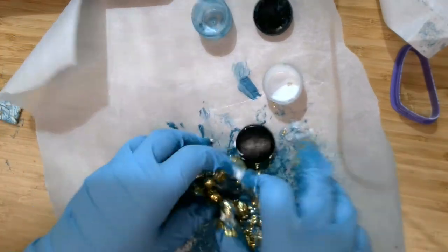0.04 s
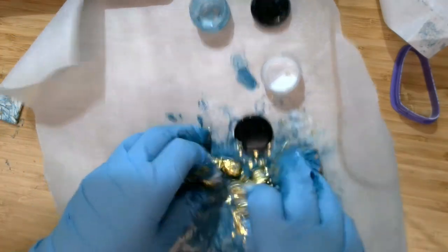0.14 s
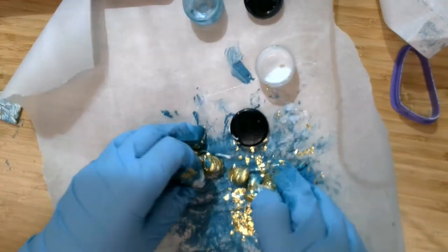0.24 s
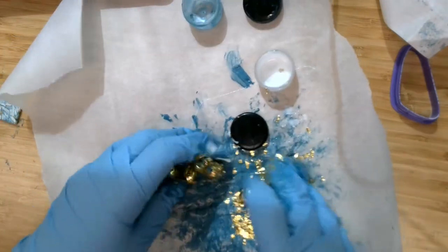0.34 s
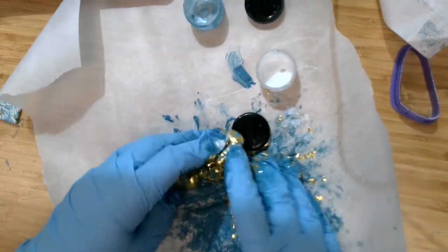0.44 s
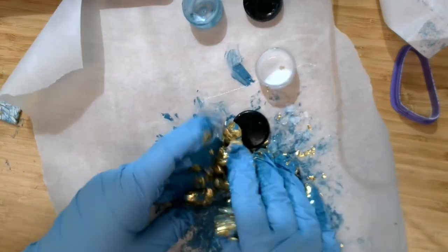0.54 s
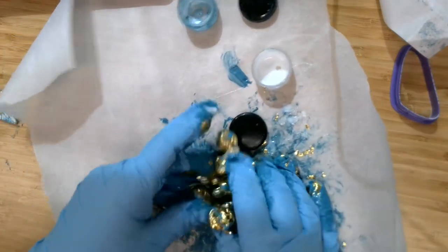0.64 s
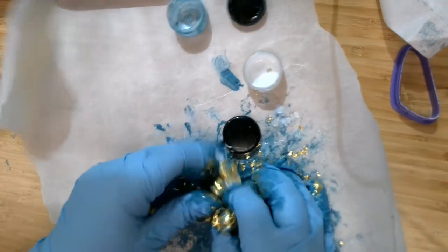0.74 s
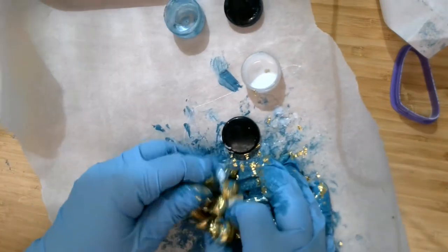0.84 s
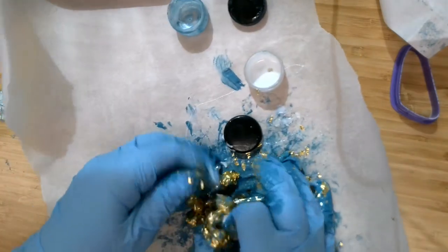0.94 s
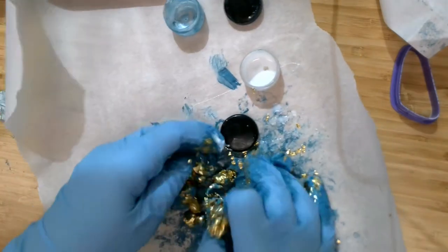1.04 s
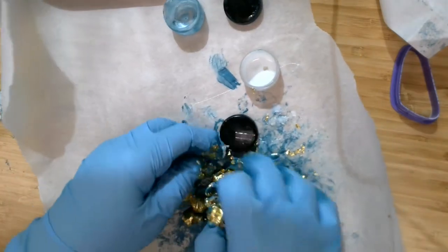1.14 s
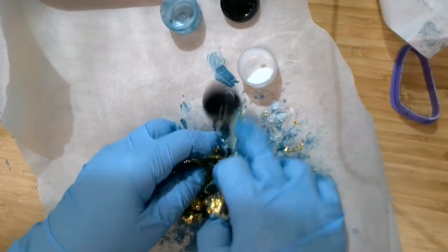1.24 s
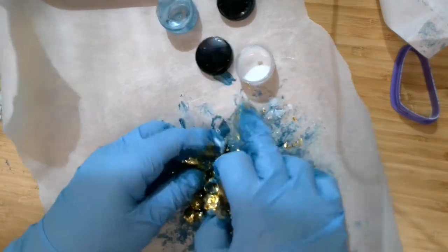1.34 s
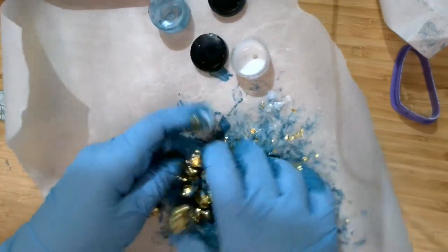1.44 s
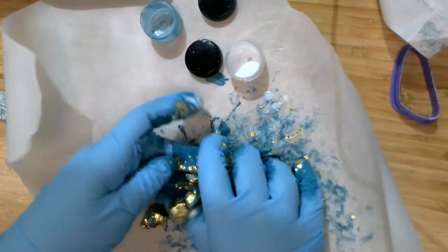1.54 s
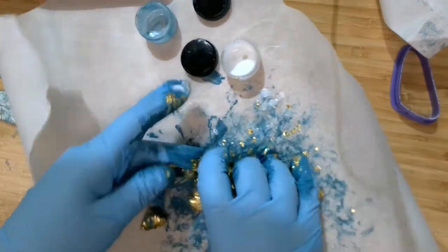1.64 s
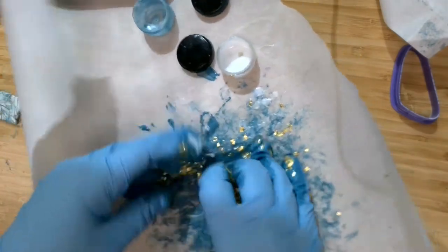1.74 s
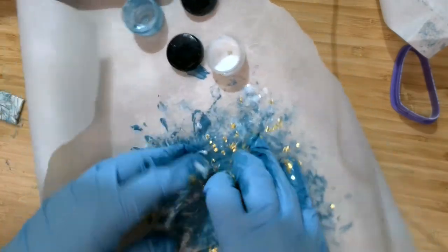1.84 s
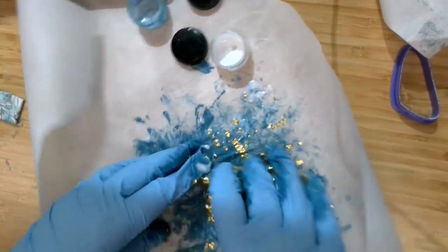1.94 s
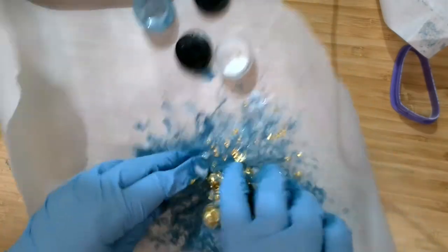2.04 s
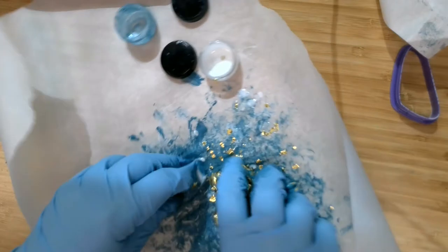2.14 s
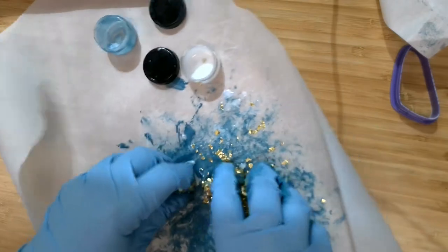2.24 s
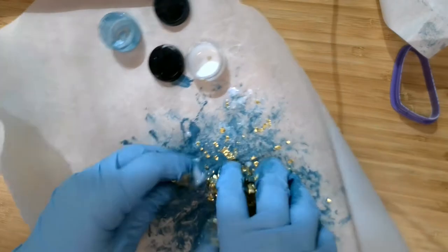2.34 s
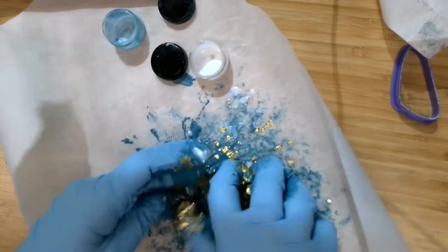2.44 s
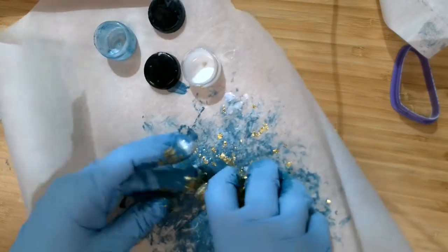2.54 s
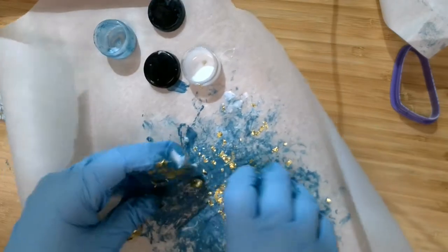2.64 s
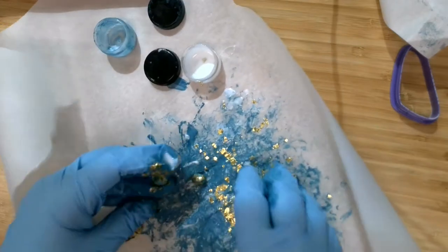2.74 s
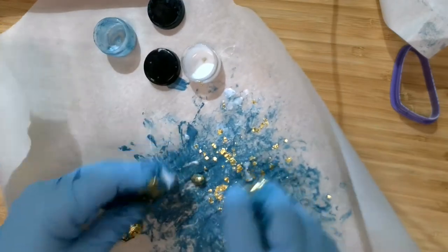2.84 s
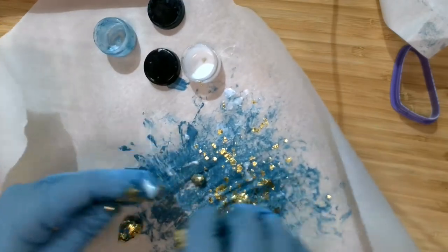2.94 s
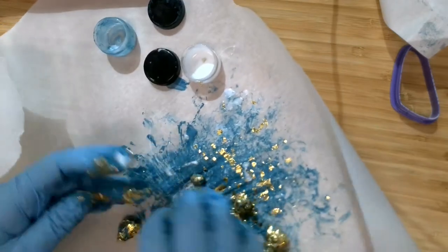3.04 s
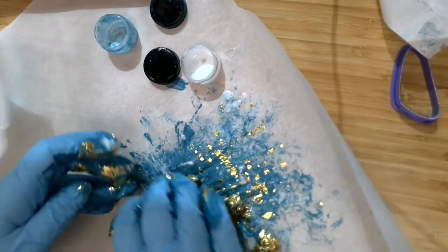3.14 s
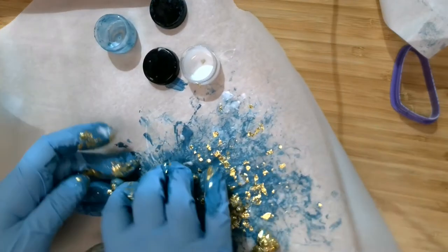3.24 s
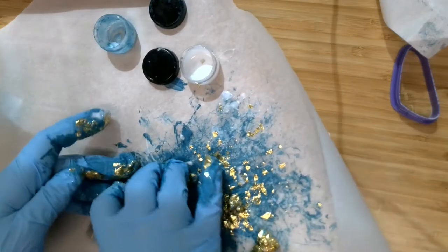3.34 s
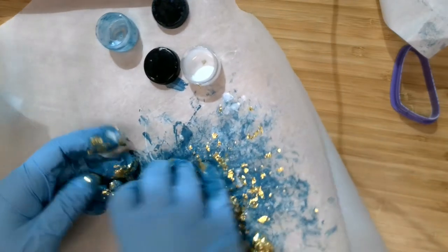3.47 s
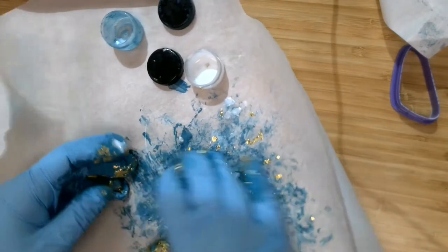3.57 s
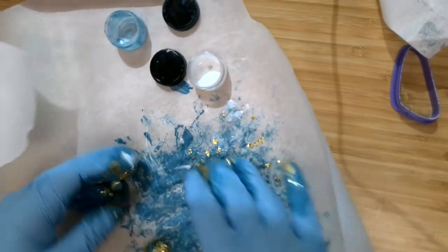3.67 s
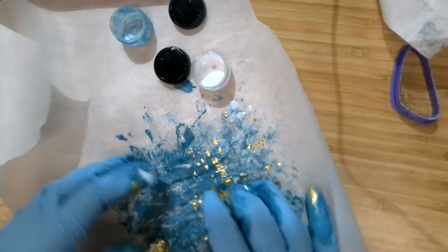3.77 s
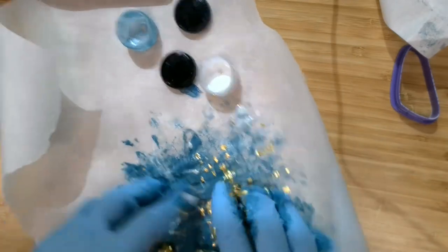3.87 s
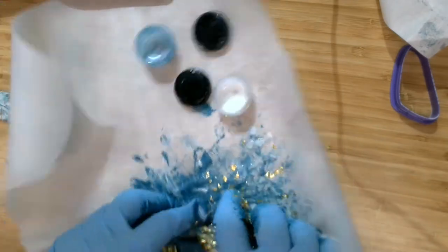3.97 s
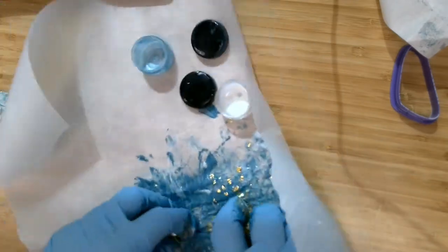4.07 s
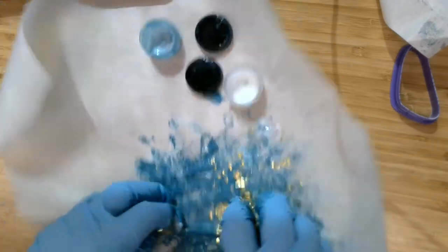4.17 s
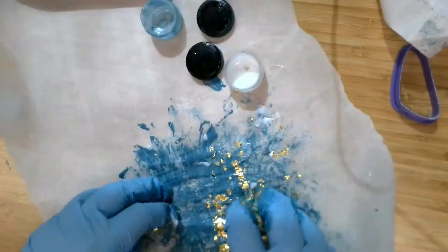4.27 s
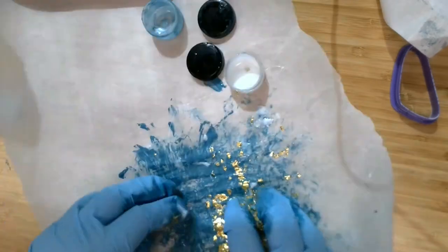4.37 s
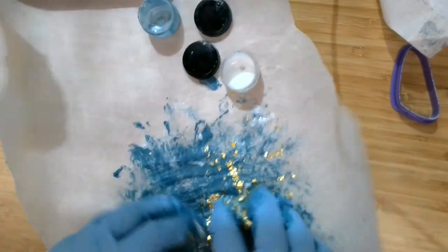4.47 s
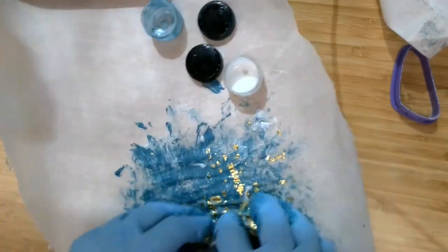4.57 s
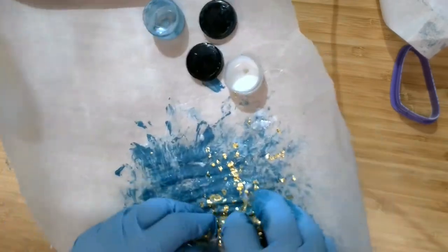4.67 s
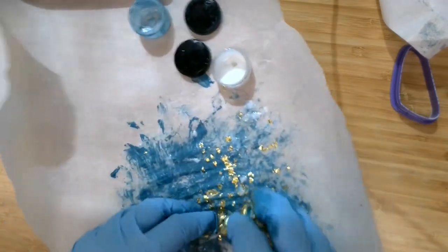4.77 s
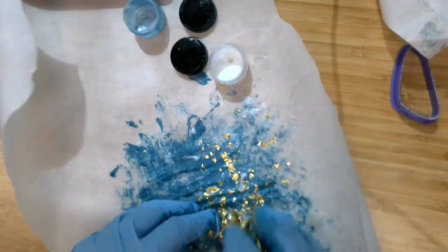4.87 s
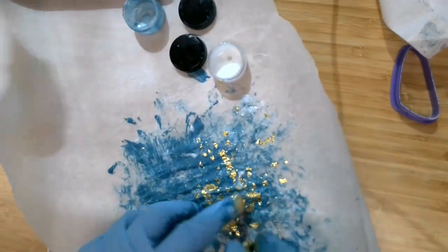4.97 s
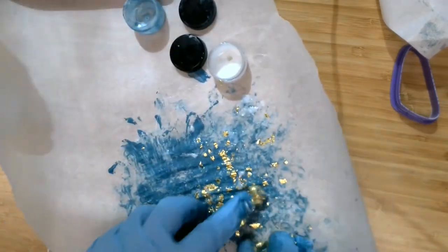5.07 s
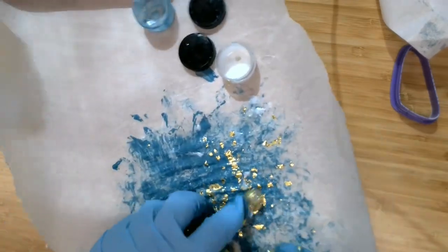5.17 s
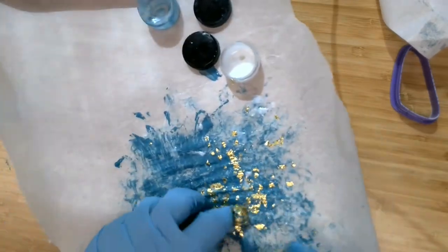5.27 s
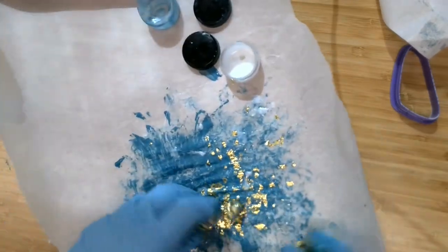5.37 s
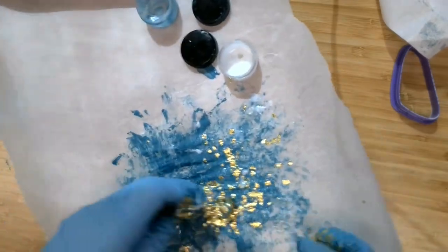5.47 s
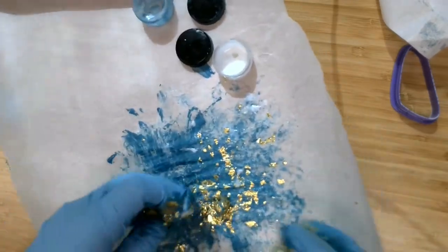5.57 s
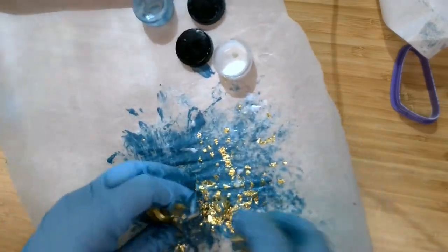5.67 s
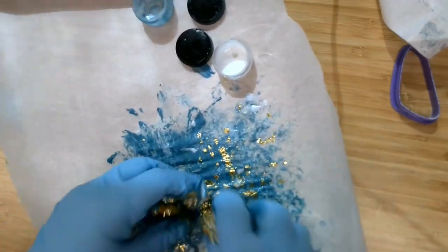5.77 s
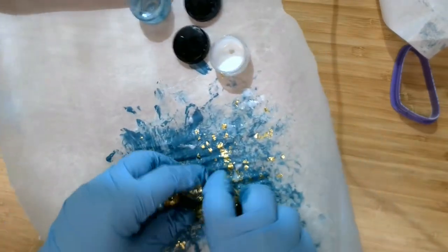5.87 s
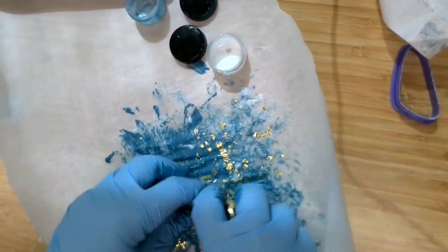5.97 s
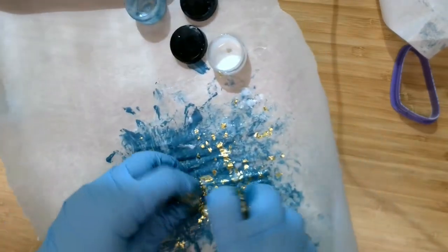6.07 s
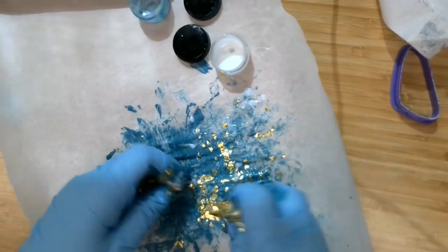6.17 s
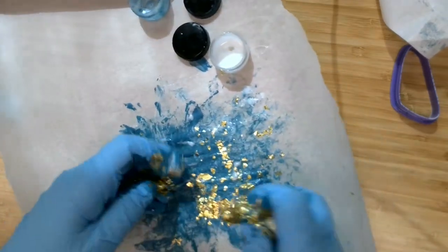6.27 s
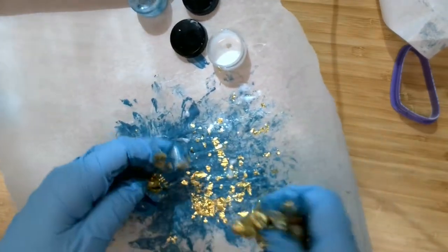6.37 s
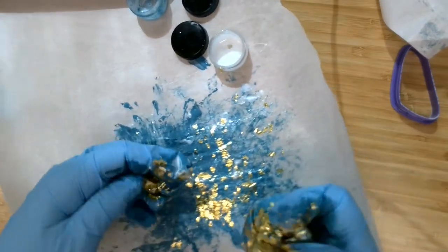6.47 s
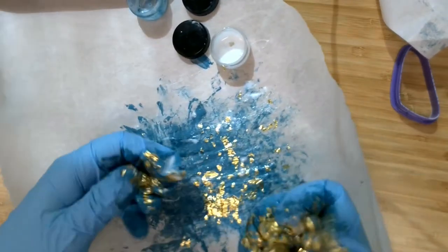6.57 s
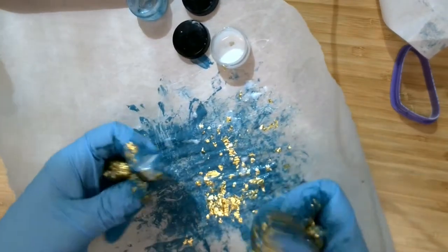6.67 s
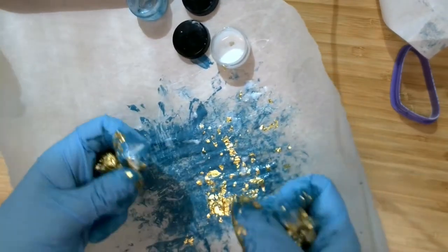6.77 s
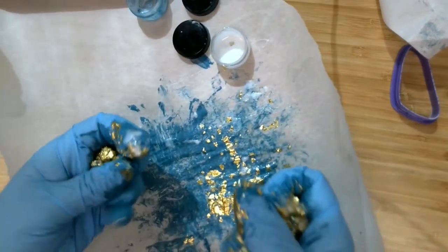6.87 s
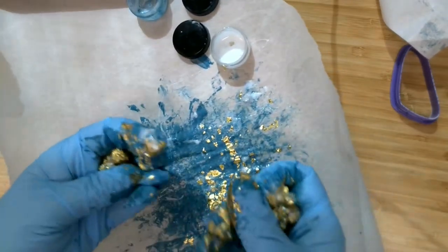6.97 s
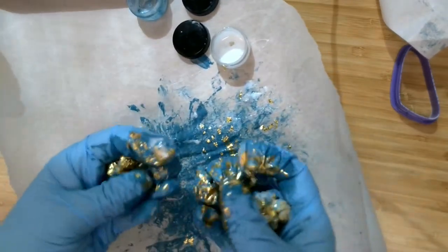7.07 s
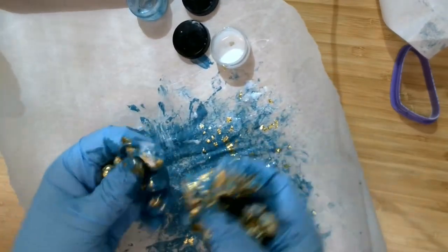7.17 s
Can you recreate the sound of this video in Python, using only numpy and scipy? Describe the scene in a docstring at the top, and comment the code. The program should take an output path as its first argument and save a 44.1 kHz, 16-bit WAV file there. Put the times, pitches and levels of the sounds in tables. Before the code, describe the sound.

Close crinkly rustling and sharp little pops of baking paper as gloves knead tacky clay, busiest around four seconds, over a faint low room hum.

```python
"""Gloved hands press and gather sticky clay on baking paper on a wooden table, close to a small microphone.
Each push sets off showers of tiny clicks: the sheet crackles as it flexes and the gloves hiss over it.
Folds snap as a pop with a burst of noise, and bumps on the table thud as fading tones with a noisy smear.
A jar lid clacks and scrapes as it is moved, made from short ringing tones and noise.
Sheet and table resonances colour the handling; a small room and a low ventilation rumble surround it."""
import sys
import numpy as np
from scipy import signal
from scipy.fft import rfft, irfft, next_fast_len
from scipy.io import wavfile
from scipy.ndimage import uniform_filter1d

SR = 44100
rng = np.random.default_rng(int(sys.argv[2]) if len(sys.argv) > 2 else 0)


def store_wav(level_fs):
    """Save 16-bit WAV to argv[1]."""
    pcm = np.round(np.clip(np.atleast_2d(level_fs), -1, 1) * 32767)
    wavfile.write(sys.argv[1], SR, pcm.T.astype(np.int16))


N = 317961

# Ventilation spectrum. Each row: frequency in Hz, relative strength in dB per Hz.
RUMBLE_SPECTRUM = [(20, -28), (45, -44), (60, -24), (80, -16), (115, -0.5), (150, 1.5), (200, -8),
                   (280, -11.5), (390, -15), (500, -22), (680, -25), (900, -35.5), (2000, -45),
                   (11000, -64)]
# Lid taps as it is picked up and set down. Each row: start in seconds, level in dB before a shared cut.
LID_TAPS = [(1.2773, -24), (1.3084, -32), (1.3385, -28), (1.4349, -27), (1.4365, -12.5), (1.4376, -27)]
# Lid scraping over the sheet. Each row: middle in seconds, length in seconds, level in dB.
LID_SLIDES = [(1.281, 0.01, -36), (1.311, 0.016, -35), (1.457, 0.06, -40.5)]
# Ringing tones of the plastic lid. Each row: pitch in Hz, level in dB, time to fade by 60 dB in seconds.
LID_MODES = [(2680, -1.5, 0.013), (3290, -2, 0.008), (4330, -15, 0.004), (5560, -3, 0.0058),
             (8265, 3, 0.005)]
# Lid rattle and scrape spectrum. Each row: frequency in Hz, relative strength in dB per Hz.
CLACK_SPECTRUM = [(100, -38), (500, 1), (880, -37), (1300, -17), (2000, 5), (3000, 10.5), (4500, -6),
                  (6500, -2), (10000, -10), (12000, -4)]
# Hands and clay bumping the table. Each row: start in seconds, level in dB before a shared cut,
# hardness in dB (harder is brighter and noisier), pitch of the thud in Hz.
BUMPS = [(.123, -39, 2, 296), (1.437, -43, 5, 480), (2.871, -43.5, -6.5, 380), (3.174, -43.5, -0.5, 586),
         (3.207, -38.5, -5.5, 380), (3.209, -38.5, -12, 195), (3.246, -40, -7, 259), (3.597, -39, 8, 380),
         (3.999, -45.5, 9.5, 557), (4.043, -35, 0, 400), (4.1, -34, -10, 597), (4.285, -47, -3, 560),
         (4.554, -40.5, -8, 140.8), (4.571, -37.5, -15, 354), (4.58, -33, -9.5, 267),
         (5.166, -38, -10, 399.6), (5.176, -32.5, -16, 351), (5.197, -35.5, -30.5, 180.4),
         (5.34, -40, -27.5, 138.8), (5.631, -49, -14, 585), (5.939, -44, -5, 326)]
# Spectrum of bump smear and table rumble. Each row: frequency in Hz, relative strength in dB per Hz.
BUMP_SPECTRUM = [(30, -33), (70, -19), (130, 4), (220, 4.5), (380, 4), (500, -3), (620, -3), (850, -12),
                 (1200, -10), (1800, -31), (4000, -83)]
# Resonances of sheet and table top. Each row: centre in Hz, width in Hz, height added to a gain of 1 in dB.
SHEET_RESONANCES = [(395, 33, -7), (579, 16, -1), (1300, 76, -13.5), (1812, 295, 1), (2484, 320, -7),
                    (3280, 420, -10.5), (4430, 270, -9), (5610, 106, -0.5), (6310, 220, -3),
                    (7150, 78, -22)]
# Folds that snap out of the rustle. Each row: time of the pop in seconds, level in dB before a shared cut,
# brightness in dB per octave, time for the run along the fold to fade by 60 dB in seconds,
# pitch of the flipped facet in Hz.
CREASES = [(0.1045, -32, -4, 0.028, 2120), (0.1223, -28, 2, 0.01, 1770), (0.1268, -20, 1, 0.015, 2030),
           (0.232, -35, -2, 0.016, 1600), (0.246, -33, -1, 0.039, 2500), (0.258, -36.5, -3, 0.011, 1600),
           (0.293, -48, -3, 0.029, 1596), (0.3198, -38, 1, 0.008, 1400), (0.363, -40, 0, 0.0068, 2880),
           (0.4463, -36, -5.5, 0.051, 1820), (0.508, -42, -1, 0.0072, 8340), (0.538, -47, 7, 0.011, 6500),
           (0.65, -46, -9, 0.025, 9500), (0.781, -38, -0.5, 0.041, 5000), (0.803, -35, 0.5, 0.046, 4100),
           (0.825, -36, 4, 0.036, 9100), (1.046, -41.5, -8, 0.028, 1303),
           (1.1203, -47.5, -10, 0.0082, 1246), (1.193, -54, 1, 0.007, 7000),
           (1.2775, -25.5, 12, 0.011, 6970), (1.2791, -29, -2, 0.012, 2800), (1.3125, -30, 14, 0.02, 8500),
           (1.323, -30, 19, 0.012, 8600), (1.334, -30, -3.5, 0.015, 3480),
           (1.3379, -27, -2.5, 0.0085, 7500), (1.3435, -36, 4, 0.01, 3730), (1.348, -28.5, 6, 0.011, 3680),
           (1.5171, -42, -4, 0.008, 3200), (1.6432, -37, -5, 0.015, 2380), (1.6631, -33, 5, 0.014, 3080),
           (1.667, -33, -5, 0.016, 2850), (1.6852, -34, -3, 0.018, 1920), (1.7197, -45, -5.5, 0.007, 2190),
           (1.736, -38.5, -4, 0.013, 3120), (1.7448, -42.5, -4.5, 0.011, 3780),
           (1.7562, -32.5, 1, 0.014, 3430), (1.761, -35, -4.5, 0.02, 2414), (1.7773, -44, -1, 0.008, 3000),
           (1.793, -48, -2, 0.009, 3500), (1.834, -43.5, 2.5, 0.021, 4940), (1.909, -46, -5, 0.031, 1214),
           (2.0, -39.5, -7.5, 0.011, 1300), (2.003, -36, -2.5, 0.018, 1100),
           (2.022, -31.5, -2, 0.024, 2930), (2.031, -38, 1, 0.027, 3260), (2.0646, -34.5, -4, 0.023, 1304),
           (2.34, -38.5, 0, 0.018, 3910), (2.3857, -39, 7.5, 0.024, 9800), (2.392, -32.5, 1.5, 0.02, 9500),
           (2.4266, -29.5, -1, 0.043, 1417), (2.4582, -31, 3.5, 0.031, 2900), (2.551, -46, 1, 0.008, 2910),
           (2.603, -39, 4.5, 0.021, 6020), (2.667, -45, 0, 0.023, 2760), (2.686, -41, 1.5, 0.009, 3680),
           (2.7035, -50.5, -2, 0.015, 4650), (2.827, -44, 1, 0.047, 4070), (2.844, -45, 4, 0.0078, 6450),
           (2.876, -41.5, -1.5, 0.034, 1117), (2.922, -39.5, 3, 0.015, 6300),
           (3.14, -46.5, -4, 0.025, 4830), (3.1755, -45, 8, 0.012, 1010), (3.207, -43, -8, 0.007, 1090),
           (3.259, -44.5, -3, 0.026, 5500), (3.2977, -40.5, 4, 0.012, 2190), (3.317, -48, 5.5, 0.01, 7140),
           (3.5409, -43, -9.5, 0.014, 2560), (3.5665, -50, -7, 0.0084, 3030),
           (3.6014, -35, -0.5, 0.017, 1786), (3.6718, -39, -4.5, 0.013, 1420),
           (3.686, -43, 0.5, 0.012, 2210), (3.889, -37.5, 0.5, 0.016, 6130),
           (4.0025, -30, -1.5, 0.013, 2990), (4.01, -36.5, -1, 0.022, 3200), (4.038, -28, 0.5, 0.025, 3150),
           (4.045, -16.5, 0, 0.051, 2284), (4.053, -18.5, 5, 0.017, 8640), (4.107, -22, -3.5, 0.03, 4660),
           (4.1148, -27, 3, 0.008, 7500), (4.119, -20, 2, 0.017, 1800), (4.1285, -20, 6, 0.013, 5500),
           (4.135, -26.5, 0.5, 0.016, 3700), (4.145, -23.5, -1, 0.01, 1390), (4.1513, -33, -4, 0.011, 4370),
           (4.229, -32, 4, 0.011, 8500), (4.2692, -20, 4, 0.013, 9630), (4.282, -23.5, 10, 0.012, 6270),
           (4.286, -23, -2, 0.015, 2084), (4.2922, -19.5, -6, 0.0093, 1997),
           (4.299, -21.5, -2, 0.012, 2700), (4.3038, -25, -3, 0.013, 1310), (4.314, -27, -3, 0.017, 2400),
           (4.324, -30, 3, 0.012, 1715), (4.33, -25.5, -3, 0.022, 1660), (4.34, -38, -6.5, 0.025, 2420),
           (4.41, -41, -4.5, 0.025, 1930), (4.472, -44, -0.5, 0.0074, 4260), (4.526, -35, 2.5, 0.012, 2630),
           (4.5643, -31.5, 4.5, 0.0063, 8400), (4.5915, -32.5, -3, 0.014, 1600),
           (4.6003, -31, 1.5, 0.03, 1600), (4.6297, -26.5, 1, 0.014, 4300), (4.703, -29, -0.5, 0.018, 2230),
           (4.7406, -42, 6, 0.011, 5330), (4.8713, -37, 11, 0.012, 6240), (4.887, -36, -4.5, 0.032, 7200),
           (4.893, -29, 6.5, 0.0063, 7300), (4.943, -42, 4.5, 0.024, 4050), (5, -45, -0.5, 0.022, 5600),
           (5.167, -31.5, -6.5, 0.026, 2680), (5.1749, -31.5, -9.5, 0.047, 2660),
           (5.198, -41, -5, 0.012, 2480), (5.21, -35.5, -9.5, 0.015, 2006), (5.253, -30, -9, 0.045, 1290),
           (5.264, -27.5, -2, 0.017, 2490), (5.2943, -26, 0, 0.029, 1990), (5.299, -22, -2.5, 0.021, 2000),
           (5.3146, -31.5, 5, 0.014, 2770), (5.3867, -38.5, -3, 0.01, 1900), (5.5614, -40, 6, 0.018, 3650),
           (5.567, -27.5, 9.5, 0.01, 3730), (5.5962, -44, 0, 0.01, 4500), (5.615, -44, 4, 0.008, 3025),
           (5.9258, -36.5, 2, 0.01, 3320), (5.9475, -39, -5.5, 0.032, 2570),
           (6.023, -30.5, -3, 0.014, 3330), (6.1017, -44.5, -5.5, 0.015, 2390),
           (6.1118, -44, -7, 0.01, 2420), (6.132, -49, -3.5, 0.018, 1610), (6.14, -48, -5, 0.014, 3030),
           (6.158, -36, -1, 0.01, 2420), (6.175, -45, -6, 0.012, 6300), (6.2013, -41.5, -6.5, 0.019, 2520),
           (6.2608, -46, -1.5, 0.011, 3670), (6.2722, -27.5, -1.5, 0.012, 8000),
           (6.279, -44, 0, 0.0083, 4500), (6.345, -43, -2, 0.008, 3370), (6.351, -38, -3.5, 0.01, 2010),
           (6.3575, -39.5, -6, 0.011, 4600), (6.372, -37.5, -4.5, 0.026, 3440),
           (6.3897, -37, -3, 0.011, 4370), (6.4157, -40.5, -3, 0.014, 2990), (6.444, -38, 1, 0.024, 6080),
           (6.465, -45, 1.5, 0.014, 2520), (6.476, -42, -1, 0.012, 3790),
           (6.5118, -40.5, -3.5, 0.025, 3370), (6.556, -34.5, -3.5, 0.036, 3460),
           (6.5642, -31, -1, 0.031, 3130), (6.5726, -35, -2.5, 0.02, 3080), (6.5915, -37, -1, 0.019, 3070),
           (6.6702, -44, 1.5, 0.014, 5200), (6.782, -58, -6.5, 0.011, 2850),
           (6.807, -55, -3.5, 0.031, 9150), (6.848, -52, -9.5, 0.025, 1003), (6.914, -56, -4, 0.026, 1375),
           (7.133, -50.5, -1.5, 0.04, 1600)]
# Spectrum of snapping folds. Each row: frequency in Hz, relative strength in dB per Hz.
SNAP_SPECTRUM = [(50, -37), (150, -39.5), (450, -6.5), (680, -6.5), (900, -7), (1200, -0.5), (2000, -2),
                 (3000, 4.5), (4500, 3.5), (7000, 6.5), (9000, 3), (10500, -0.5), (12000, -12.5)]
# Spectrum of the flexing sheet. Each row: frequency in Hz, relative strength in dB per Hz.
CRACKLE_SPECTRUM = [(40, -31), (100, -25), (250, -7), (400, -5.5), (650, 4.5), (900, -3), (1150, 9.5),
                    (1500, 0.5), (2000, 5), (3000, 8), (4200, 2.5), (6000, 2), (11000, -26.5)]
# Spectrum of the gloves' hiss. Each row: frequency in Hz, relative strength in dB per Hz.
SCUFF_SPECTRUM = [(500, -52), (2000, -15.5), (3500, -8.5), (5000, 0), (6500, 2.5), (7500, 4), (9000, 4),
                  (10500, -1), (12000, -12)]
# Pushes of the hands. Each row: start in seconds, length in seconds, crackle of the flexing sheet in dB,
# hiss of gloves and clay in dB, swell from start to end in dB.
PUSHES = [(0.096, 0.033, -45, -43, 3.5), (0.162, 0.045, -47, -45.5, 5.5), (0.22, 0.066, -44, -42, -0.5),
          (0.349, 0.051, -48.5, -53, -5), (0.496, 0.059, -62.5, -58, -13), (0.728, 0.1, -51, -43, 3.5),
          (0.831, 0.029, -54.5, -49.5, -5), (0.91, 0.05, -61.5, -55.5, 3.5), (1.052, 0.13, -64.5, -70, 9.5),
          (1.306, 0.0093, -42, -42, -2.5), (1.44, 0.12, -51.5, -48, -6), (1.625, 0.2, -48.5, -47.5, -9),
          (1.907, 0.024, -57, -48, -2.5), (2.028, 0.032, -41, -45, 1), (2.119, 0.072, -51, -45.5, -5),
          (2.263, 0.18, -50, -44, 3.5), (2.581, 0.19, -60, -52.5, -12), (2.915, 0.11, -58, -50, 3.5),
          (3.151, 0.21, -60, -55.5, -7), (3.577, 0.09, -48, -44.5, 3.5), (3.768, 0.13, -64, -60, 6.5),
          (4.007, 0.033, -34.5, -32.5, 6.5), (4.071, 0.058, -31, -37, 2), (4.161, 0.063, -38.5, -40.5, 4),
          (4.241, 0.083, -30.5, -33.5, 4), (4.369, 0.09, -53, -58, -20.5), (4.599, 0.1, -45.5, -41, -3.5),
          (4.802, 0.095, -55.5, -52, 1.5), (4.991, 0.067, -63.5, -57.5, -1.5),
          (5.235, 0.069, -41.5, -42.5, 1.5), (5.38, 0.12, -63, -59.5, 0.5), (5.56, 0.041, -55.5, -48, -2),
          (5.744, 0.026, -83, -60, -10), (5.937, 0.13, -52.5, -55, -11), (6.12, 0.18, -56, -58, 0.5),
          (6.357, 0.16, -51, -56, -9), (6.55, 0.11, -54.5, -53, -5)]
# Kneading between pushes, lighter when the fingers lift the clay off the sheet.
# Each row: time in seconds, crackle in dB, hiss in dB.
KNEADING = [(0, -57, -52.5), (1, -72, -61.5), (3, -65.5, -62.5), (4.501, -58.5, -60.5), (5.1, -73, -66.5),
            (7.2, -74.5, -65.5)]

RUMBLE_DB = -48.5  # the level it wavers around
ROOM_T60_S, ROOM_DB = 0.25, -12.5  # fade by 60 dB; tail against the direct sound
TOP_HZ = 11150
CRACK_HZ = 3260  # the lid's rim lands with one short swing of pressure around this pitch
# Soft clay pushes gradually and damps the table; the noise level is for a hardness of -9.5 dB
THUD_ATTACK_CYCLES, THUD_RING_CYCLES, THUD_NOISE_DB = 1.3, 15, -3
SMALL_CREASES_PER_S, SMALL_CREASE_DB = 55, -13  # level against the crackle of the flexing sheet
GIVE_SHARE = 0.76  # build-up before a pop, as a share of the run after it
EVEN_RUN_S = 0.0072  # for a run this long, the first pop is about as strong as the later ones together
FACET_WIDTH, FACET_DB = 0.11, 6.5  # width as a share of its pitch; height added to a gain of 1
ATTACK_DB_PER_S, RELEASE_DB_PER_S = 479.5, 290  # a push builds quickly, the sheet relaxes more slowly


def undb(db):
    """Turn decibels into gain."""
    return 10 ** (np.asarray(db) / 20)


def unit(x):
    """Scale a sound to an rms of 1."""
    return x / np.sqrt(np.mean(x ** 2) + 1e-20)


def add(out, s, x):
    """Mix x into out from time s in seconds."""
    i = max(int(s * SR), 0)
    out[i:i + len(x)] += x[:max(len(out) - i, 0)]


def through(x, response):
    """Pass a sound through a response and keep its length."""
    return signal.fftconvolve(x, response)[:len(x)]


def fade(t, t60):
    """A steady fade that loses 60 dB in t60."""
    return np.exp(-np.log(1000) * t / t60)


def highpass(x, hz):
    """Take away the sound below hz."""
    return signal.sosfilt(signal.butter(2, hz, "high", fs=SR, output="sos"), x)


def colour(points, tilt_db=0, peaks=(), size=4096):
    """Make a filter of unit energy from a spectrum, tilted by dB per octave, with resonances on top."""
    f = np.fft.rfftfreq(size, 1 / SR) + 1
    hz, db = np.transpose(points)
    spectrum_db = np.interp(np.log(f), np.log(hz), db)
    gain = undb(spectrum_db + tilt_db * np.log2(np.clip(f, 200, 9000)))
    for centre, width, peak_db in peaks:
        gain = gain * (1 + undb(peak_db) / (1 + (2 * (f - centre) / width) ** 2))
    # folding the cepstrum makes the response start at once, with nothing before time zero
    cepstrum = irfft(np.log(gain))
    cepstrum[1:size // 2] *= 2
    cepstrum[size // 2 + 1:] = 0
    response = irfft(np.exp(rfft(cepstrum)))
    return response / np.linalg.norm(response)


def tail(t60):
    """Fading noise of unit energy."""
    t = np.arange(SR // 2) / SR
    x = rng.standard_normal(len(t)) * fade(t, t60)
    return x / np.linalg.norm(x)


def walk(rate):
    """A smooth random wander with a spread near 1 that heads for a new value rate times a second."""
    steps = rng.standard_normal(N // 10)
    return np.interp(np.arange(N) * rate / SR, np.arange(len(steps)), steps) * np.sqrt(3 / 2)


def slips(rate, spread_db):
    """Tiny sudden slips, rate a second, of random size; each short stretch spends about the same energy."""
    happens = rng.random(N) < rate / SR
    sizes = undb(spread_db * np.minimum(rng.exponential(size=N), 3.8))
    x = happens * sizes * rng.choice([-1, 1], N)
    nearby_energy = np.abs(uniform_filter1d(x ** 2, size=2200))
    return x / np.sqrt(nearby_energy + 1e-6)


def tear(clicks, t60, pop_db):
    """Every click is a pop followed by its own brief spray of fibre noise, so no two sound the same."""
    energy = through(clicks ** 2, tail(t60)[:2048] ** 2)
    spray = np.sqrt(np.abs(energy)) * rng.standard_normal(N)
    return unit(undb(pop_db) * clicks + spray)


def facets(clicks, low_hz, high_hz, t60):
    """Each click flips a small facet of the sheet, which rings briefly at its own pitch."""
    out, t = np.zeros(N), np.arange(512) / SR
    chance = rng.random((N // 20, 2))
    for i, (pitch, length) in zip(np.flatnonzero(clicks), chance):
        hz = low_hz * (high_hz / low_hz) ** pitch
        ring = np.sin(2 * np.pi * hz * t) * fade(t, t60 * (.5 + length))
        add(out, i / SR, clicks[i] * ring / np.linalg.norm(ring))
    return unit(out)


def shimmer(x, flicker_db, rate, count=20):
    """Quarter-octave bands of a sound swell and fade at random, each on its own."""
    size = next_fast_len(N)
    band_of = 4 * np.log2(np.fft.rfftfreq(size, 1 / SR) / 450 + 1e-6)
    spectrum, out = rfft(x, size), 0
    for band in np.eye(count):
        share = np.interp(band_of, np.arange(count), band)
        # the last term keeps the average energy about the same
        gain = undb(flicker_db * walk(rate) - flicker_db ** 2 / 10)
        out = out + irfft(spectrum * share, size)[:N] * gain
    return out


def ventilation():
    """Moving air gives a low rumble: coloured noise that wavers slightly."""
    rumble = unit(through(rng.standard_normal(N), colour(RUMBLE_SPECTRUM)))
    return rumble * undb(RUMBLE_DB + 1.1 * walk(rate=9.4))


def room(x):
    """The walls answer the direct sound with a short, duller tail of fading noise."""
    response = np.zeros(SR)
    response[0] = 1
    walls = through(tail(ROOM_T60_S), colour([(100, -1.5), (3000, -1.5), (6000, -2.5), (11000, -3.0), (20000, -4.0)]))
    add(response, .004, undb(ROOM_DB) * walls)
    return through(x, response / np.linalg.norm(response))


def lid():
    """The plastic lid is picked up, clacks down and is pushed along; the paper damps its ringing at once."""
    out, t = np.zeros(N), np.arange(2048) / SR
    ring = sum(undb(db) * np.cos(2 * np.pi * hz * t) * fade(t, t60) for hz, db, t60 in LID_MODES)
    rattle = through(tail(t60=0.025)[:len(t)], colour(CLACK_SPECTRUM))
    swing = 2 * np.pi * CRACK_HZ * t - np.pi
    crack = highpass(swing * np.exp(-swing ** 2 / 2), 1500)
    clack = undb(-2.0) * unit(crack) + undb(-10) * unit(ring) + undb(-1.5) * unit(rattle)
    for s, db in LID_TAPS:
        add(out, s, clack * undb(db - 16.5))
    # scraping is a run of tiny slips that keep striking the lid
    rubbed = through(slips(rate=2400, spread_db=-4.0), ring)
    scrape = unit(through(rubbed, colour(CLACK_SPECTRUM)))
    time = np.arange(N) / SR
    for s, length, db in LID_SLIDES:
        out += scrape * undb(db) * np.exp(-(2 * (time - s) / length) ** 2)
    return out


def bumps():
    """Soft blows make the table top thud, each at its own pitch; harder ones smear more brightly."""
    out, t = np.zeros(N), np.arange(SR // 2) / SR
    for s, db, hard_db, hz in BUMPS:
        cycles = hz * t
        attack = 1 - np.exp(-(cycles / THUD_ATTACK_CYCLES) ** 2)
        thud = np.sin(2 * np.pi * cycles) * attack * fade(cycles, THUD_RING_CYCLES)
        smear = through(tail(t60=0.11), colour(BUMP_SPECTRUM, (hard_db + 15.0) / 2, SHEET_RESONANCES))
        blow = unit(thud) + undb(THUD_NOISE_DB + (hard_db + 9.5) / 2) * unit(smear)
        add(out, s, unit(blow) * undb(db - 16.5))
    return out


def creases():
    """A fold starts to give, pops, and an uneven avalanche runs along it: short runs snap, long runs crunch."""
    out, lead = np.zeros(N), SR // 125  # at most 8 ms of giving before the pop
    for s, db, tilt_db, run_s, facet_hz in CREASES:
        # a reversed tail grows towards the pop
        giving = np.sqrt(abs(GIVE_SHARE) / 2) * tail(GIVE_SHARE * run_s)[:lead][::-1]
        burst = np.concatenate([giving, tail(run_s)])[:2048] * run_s / EVEN_RUN_S
        burst *= np.repeat(undb(3 * rng.standard_normal(64) - 1), 32)  # uneven in short steps
        burst[lead] += 1  # the pop itself
        facet = (facet_hz, FACET_WIDTH * facet_hz, FACET_DB)
        snap = through(burst, colour(SNAP_SPECTRUM, tilt_db, [*SHEET_RESONANCES, facet]))
        add(out, s - lead / SR, unit(snap) * undb(db - 11.5))
    return highpass(out, 200)  # a thin sheet radiates almost no bass


def effort():
    """Levels of crackle and hiss in dB: each push builds out of the kneading, swells or eases, and lets go."""
    t = np.arange(N) / SR
    times, *levels = np.transpose(KNEADING)
    flex_db, scuff_db = (np.interp(t, times, level) for level in levels)
    for s, length, crackle_db, hiss_db, swell_db in PUSHES:
        shape_db = np.interp(t, [s, s + length], [-swell_db / 2, swell_db / 2])
        shape_db -= ATTACK_DB_PER_S * np.maximum(s - t, 0)
        shape_db -= RELEASE_DB_PER_S * np.maximum(t - s - length, 0)
        flex_db = np.maximum(flex_db, crackle_db + shape_db)
        scuff_db = np.maximum(scuff_db, hiss_db + shape_db)
    return flex_db, scuff_db


def small_creases():
    """Lesser folds pop at random, as strongly as the sheet is flexed, each flipping a facet of its own pitch."""
    flex_db, _ = effort()
    folds = slips(rate=SMALL_CREASES_PER_S, spread_db=0.5)
    pops = tear(folds, t60=0.007, pop_db=1.0)
    pops += undb(-6.5) * facets(folds, low_hz=1310, high_hz=7000, t60=0.0039)
    loudness = undb(flex_db + SMALL_CREASE_DB)
    return through(pops * loudness, colour(SNAP_SPECTRUM, tilt_db=-1.5, peaks=SHEET_RESONANCES))


def table_slide(scuff_db):
    """Hands sliding about make the table top rumble, louder when they scuff harder."""
    rumble = through(rng.standard_normal(N), colour(BUMP_SPECTRUM))
    return rumble * undb(-56.0 + 0.39 * (scuff_db + 52.0))


def rustle():
    """The sheet buckles in tiny clicks, faster when pushed harder; gloves add finer stick-slip grains."""
    flex_db, scuff_db = effort()
    buckles = slips(330 * undb(.45 * (flex_db + 49)), spread_db=0.0)
    peels = slips(rate=160, spread_db=2.5)  # tacky clay letting go of the gloves
    grains = slips(rate=6000, spread_db=3.0)
    grip_db = 2.0 * walk(rate=60)  # the fingers catch and slide

    flex = undb(1.0) * tear(buckles + grains / 2, t60=0.032, pop_db=-5.5)
    flex += undb(-23.5) * facets(buckles, low_hz=1640, high_hz=5700, t60=0.0076)

    rubbing = undb(-11.0) * buckles + undb(-9.0) * peels + grains
    scuff = undb(-1.5) * tear(rubbing, t60=0.0098, pop_db=-6.0)
    scuff += undb(-14.5) * facets(peels + undb(-5) * buckles, low_hz=4000, high_hz=11000, t60=0.0099)

    sound = through(flex * undb(flex_db + grip_db), colour(CRACKLE_SPECTRUM, peaks=SHEET_RESONANCES))
    sound += through(scuff * undb(scuff_db + grip_db), colour(SCUFF_SPECTRUM, peaks=SHEET_RESONANCES))
    return shimmer(sound, flicker_db=3.0, rate=70) + table_slide(scuff_db)


def scene():
    """All the handling, heard in the room over the ventilation."""
    handling = rustle() + creases() + small_creases() + lid() + bumps()
    return (room(handling) + ventilation())[None]


def record(dry):
    """The small microphone passes almost nothing above its top frequency."""
    return signal.sosfilt(signal.ellip(7, .3, 65, TOP_HZ, fs=SR, output="sos"), dry)


dry = scene()
out = record(dry)
store_wav(out)
```